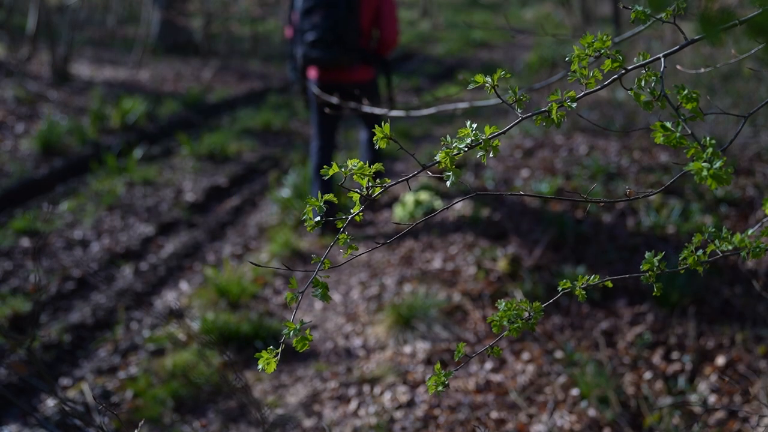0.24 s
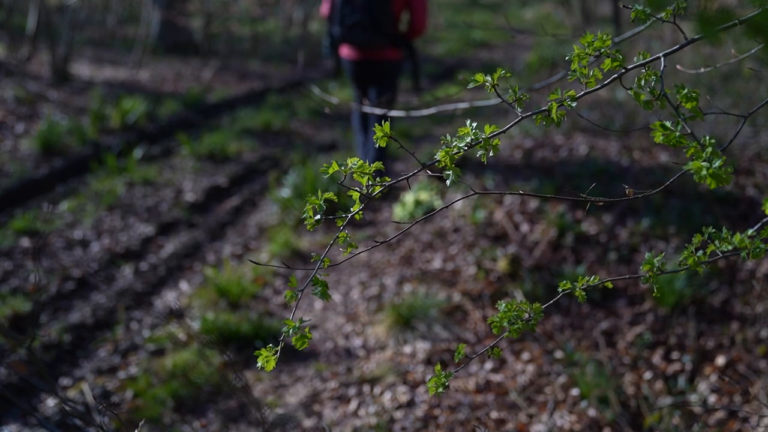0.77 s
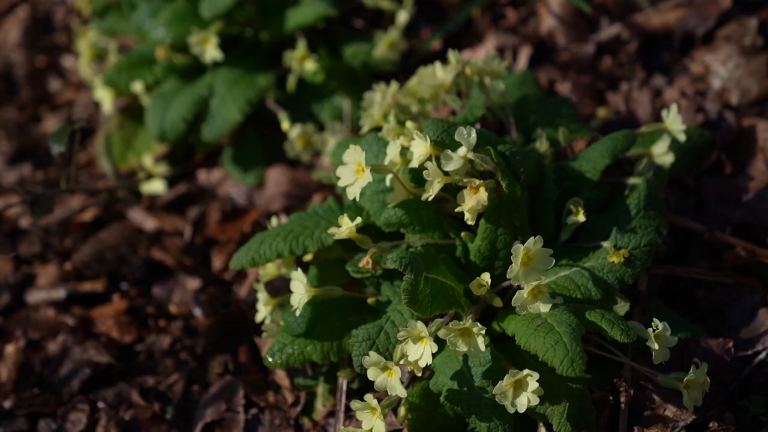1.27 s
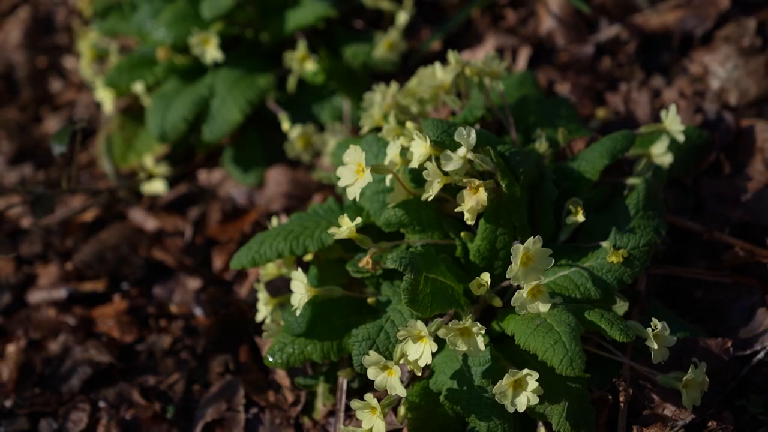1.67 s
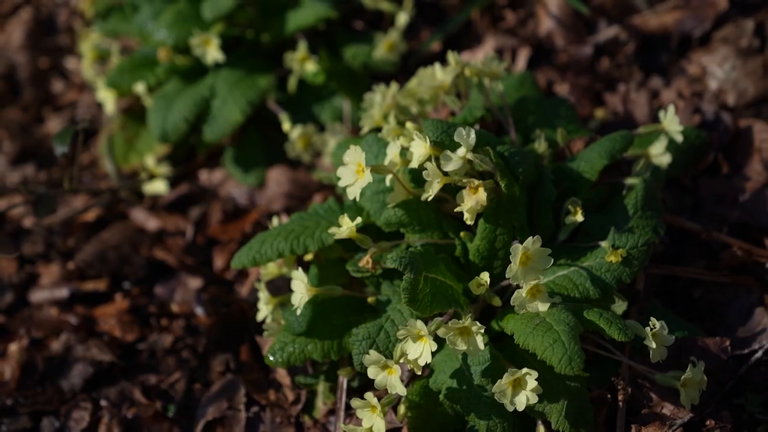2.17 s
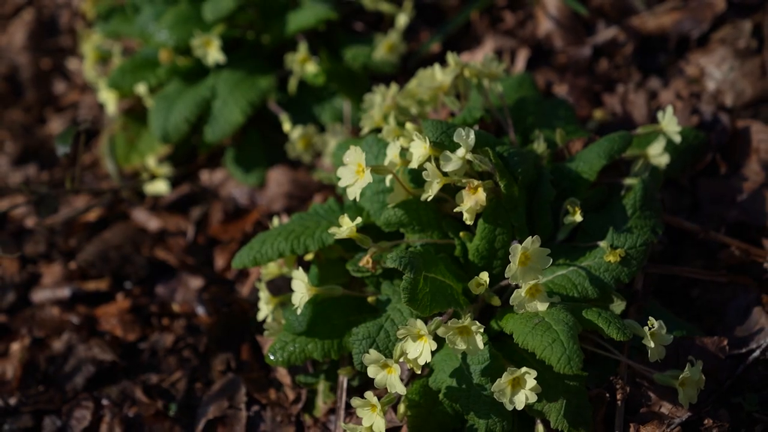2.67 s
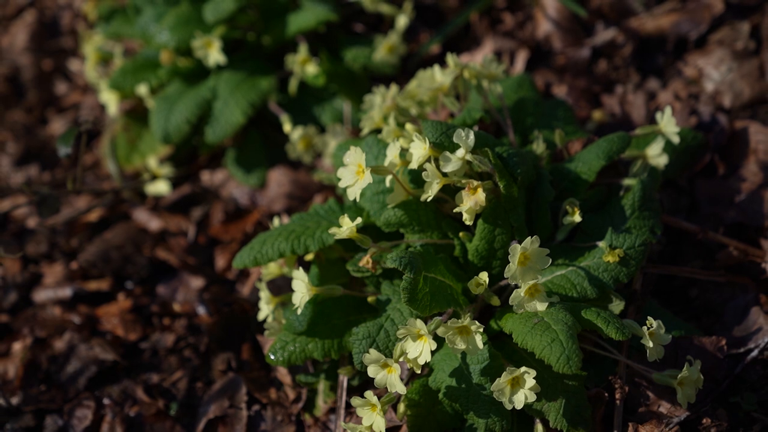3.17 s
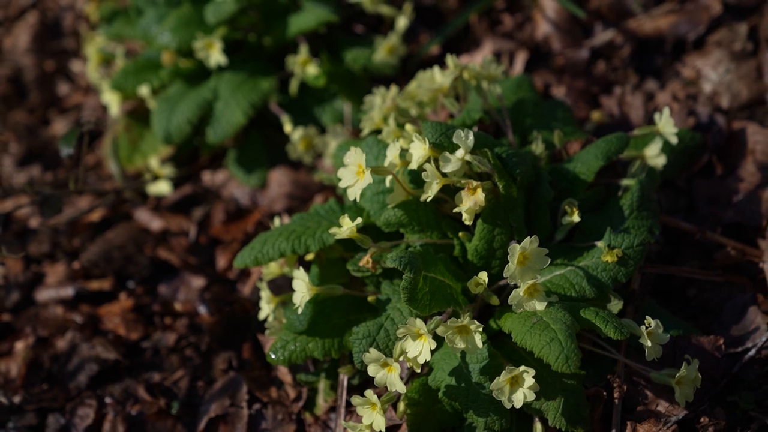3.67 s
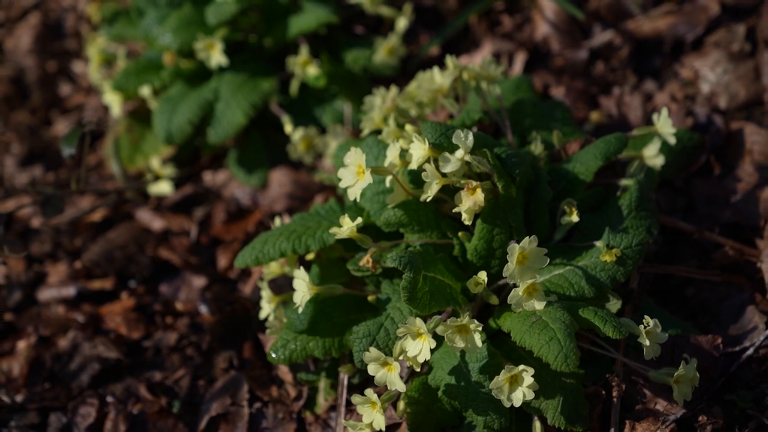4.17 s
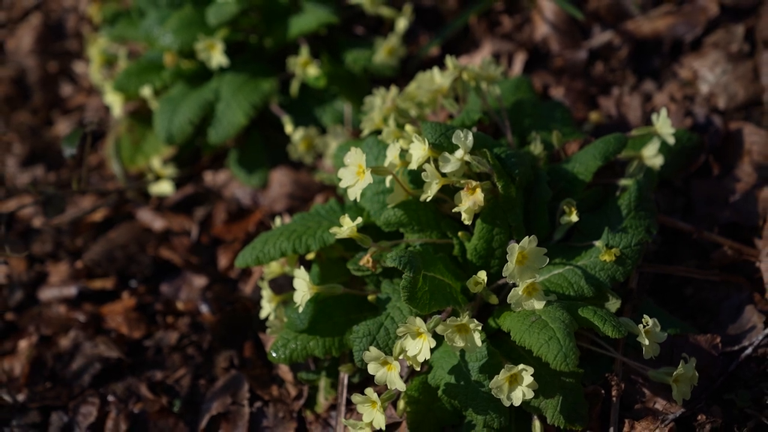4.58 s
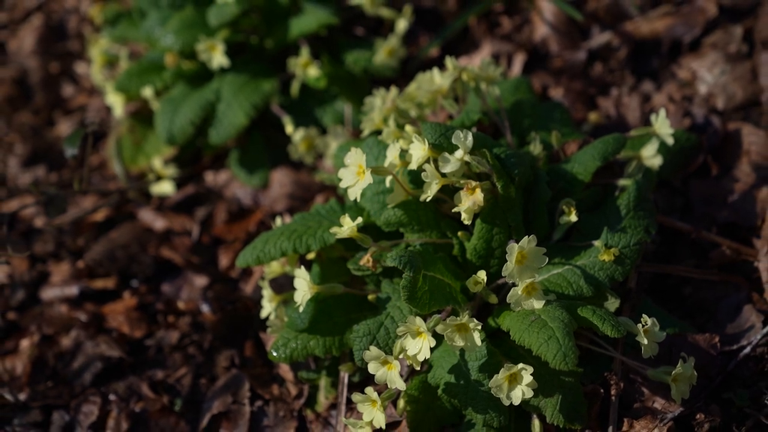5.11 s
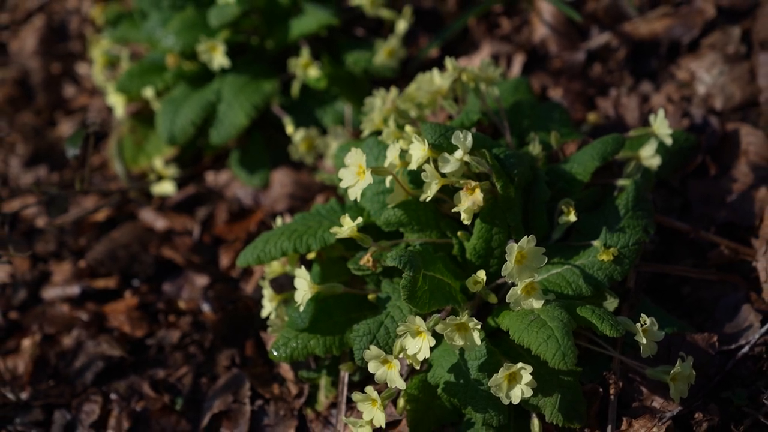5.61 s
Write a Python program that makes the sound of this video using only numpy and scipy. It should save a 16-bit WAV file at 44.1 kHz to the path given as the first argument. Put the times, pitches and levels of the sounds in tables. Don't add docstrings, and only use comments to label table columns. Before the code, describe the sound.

Outdoors in a wood, over soft far traffic rumble and steady hiss, a warbler gives sharp falling chirps with long echoes while boots crunch soil and dry leaves and twigs snap. At about 1.2 seconds the scene cuts: steps stop, one loud clear whistle arches close by, then fainter far whistles, a twittering flock and finally the warbler again.

```python
import sys
import numpy as np
from scipy import signal
from scipy.fft import rfft, irfft, next_fast_len
from scipy.io import wavfile
from scipy.ndimage import uniform_filter1d

SR = 44100
rng = np.random.default_rng(int(sys.argv[2]) if len(sys.argv) > 2 else 0)


def rack_gain(trim_db):
    fader = np.asarray(trim_db, float)
    return 10 ** (fader / 20)


def generate_wav(sig):
    pcm = np.round(np.clip(np.atleast_2d(sig).T, -1, 1) * 32767).astype(np.int16)
    wavfile.write(sys.argv[1], SR, pcm)


N = 257984
SCENE_CHANGE_S = 1.2293


def evened(x):
    return x / np.sqrt(np.mean(x ** 2) + 1e-20)


def read(points, hz):
    point_hz, value = np.transpose(points)
    return np.interp(np.log(hz + 1), np.log(point_hz + 1), value)


def add(mix, start_s, sound):
    part = mix[round(start_s * SR):][:len(sound)]
    part += sound[:len(part)]


def colour(x, points):
    size = next_fast_len(len(x))
    gain = rack_gain(read(points, np.fft.rfftfreq(size, 1 / SR)))
    return irfft(rfft(x, size) * gain, size)[:len(x)]


def drift(count, window):
    return evened(uniform_filter1d(rng.standard_normal(count), size=window))


def whistle(pitch_hz, level_db, flicker_db):
    size = len(pitch_hz)
    noise = uniform_filter1d(rng.standard_normal((2, SR)), size=300)
    flicker, wobble = evened(uniform_filter1d(noise, size=200))[:, :size]
    pitch_hz = pitch_hz * (1 + 0.0022 * flicker_db * wobble)
    tone = np.sin(2 * np.pi * np.cumsum(pitch_hz) / SR)
    tone *= signal.windows.tukey(size, min(1, 160 / size))
    return np.sqrt(2) * rack_gain(level_db + flicker_db * flicker) * tone


# pitch_hz, t60_s
TRUNK_DECAY = [(500, 2.1), (2300, 2.2), (3500, 1.64), (5200, 1), (8000, 1.09)]


def wood(x, wet_db, build_s, early_db, depth=0.92, path=((0, 0),)):
    count = 2 * SR // 20
    echoes = np.zeros(2 * SR)
    echoes[20 * np.arange(count) + rng.integers(0, 20, count)] = rng.choice([-1., 1.], count)
    hz, t, bands = signal.stft(echoes, SR, nperseg=256)
    t60_s = depth * read(TRUNK_DECAY, hz)[:, None]
    tail = signal.istft(bands * rack_gain(-60 * t / t60_s), SR, nperseg=256)[1]
    tail *= 1 - np.exp(-np.arange(len(tail)) / SR / build_s)
    tail *= rack_gain(wet_db) / np.sqrt(np.sum(tail ** 2))
    bounces = np.round(np.array([.0031, .0074, .0131, .022]) * SR).astype(int)
    tail[bounces] += rack_gain(early_db) * np.array([-0.048, -0.73, 0.73, -0.61])
    return colour(x, path) + signal.fftconvolve(x, tail)[:N]


def sing(notes, wet_db, build_s, early_db, depth, path=((0, 0),)):
    dry = np.zeros(N)
    for start_s, sound in notes:
        add(dry, start_s, sound)
    return wood(dry, wet_db, build_s, early_db, depth, path)


# pitch_hz, level_db (per Hz)
AIR_SPECTRUM = [(13, -57), (22, -30.5), (54, 1.5), (114, -2), (240, -14.5), (325, -14.5), (427, -17.5),
                (477, -16.5), (782, -16), (1430, -26), (3440, -23.5), (5800, -24.5), (15600, -30)]
# start_s, level_db
TRAFFIC_SWELL = [
    (0.0, -63),
    (0.9, -64.5),
    (1.9, -60),
    (2.3, -61.5),
    (2.7, -60.5),
    (3.7, -58),
    (4.1, -60.5),
    (4.6, -59),
    (5.85, -62),
]
AIR_DB = -57.5


def air():
    frames, hz = N // 256 + 5, np.fft.rfftfreq(1024, 1 / SR)
    real, imaginary, patches = rng.standard_normal((frames, 513, 3)).T
    patches = uniform_filter1d(patches, size=10, axis=0)
    patches = evened(uniform_filter1d(patches, size=30, axis=1))
    start_s, level_db = np.transpose(TRAFFIC_SWELL)
    frame_s = (np.arange(frames) - 2) * 256 / SR
    swell_db = np.interp(frame_s, start_s, level_db - level_db.mean())
    rumble_share = 0.75 / (1 + (hz[:, None] / 200) ** 4)
    bands = (real + 1j * imaginary) * rack_gain(0.096 * patches + rumble_share * swell_db)
    noise = signal.istft(bands, nperseg=1024, noverlap=768)[1][:N]
    return rack_gain(AIR_DB) * evened(colour(noise, AIR_SPECTRUM))


# start_s, level_db
FLOCK_SWELL = [
    (2.901, -83),
    (3.3, -80),
    (3.7, -85),
    (4.0, -78.5),
    (4.35, -75),
    (4.7, -87),
    (5.05, -75.5),
    (5.4, -81),
    (5.85, -78),
]


def flock():
    notes = []
    s, db = np.transpose(FLOCK_SWELL)
    for when, pitch, glide in rng.random((260, 3)):
        start_s = s[0] + when * (s[-1] - s[0])
        pitch_hz = (3700 + 1700 * pitch) * np.linspace(1.08 + 0.193 * glide, 1, 700)
        notes.append((start_s, whistle(pitch_hz, np.interp(start_s, s, db), 1.35)))
    return notes


# start_s, length_s, pitch_hz, level_db
DISTANT_NOTES = [(1.88, .07, 2274, -76), (1.98, .08, 2075, -79), (2.1, .078, 1980, -79.5),
                 (2.22, .089, 1880, -79), (2.4, .08, 1885, -87), (2.552, .08, 1905, -85),
                 (3.497, .07, 7500, -75.5), (3.696, 0.048, 7130, -75), (3.84, .05, 7300, -80),
                 (4.575, .13, 6650, -80), (4.857, 0.077, 2370, -78), (4.948, 0.085, 2255, -76.5),
                 (5.17, 0.094, 1833, -80), (5.27, 0.06, 1875, -82), (5.37, .1, 1856, -85),
                 (4.84, .043, 4170, -74)]
DISTANT_FALL = .04


def distant():
    notes = []
    for start_s, length_s, pitch_hz, level_db in DISTANT_NOTES:
        size = round(length_s * SR)
        fall = DISTANT_FALL * np.linspace(.5, -.5, size)
        waver = 0.02 * drift(SR, 900)[:size]
        notes.append((start_s, whistle(pitch_hz * (1 + fall + waver), level_db, 3.6)))
    return sing(notes + flock(), 1.7, 0.0083, -11.0, 1.0)


# start_s, level_db (peak), pitch_hz
TWIG_SNAPS = [(.392, -46, 5300), (.596, -44, 6900), (.598, -52, 8700), (.657, -47, 8000), (.66, -51, 4540),
              (.725, -45, 7550), (.757, -48, 5630), (.79, -47, 10000), (.796, -46, 9500), (.807, -47, 7000),
              (.856, -50, 10100)]
TWIG_T60_S = 0.015
# start_s, level_db (peak), pitch_hz, t60_s
STONE_KNOCKS = [(.043, -48.5, 594, 0.031), (.087, -50, 1210, 0.027), (.107, -51.5, 1160, 0.034),
                (.262, -52, 461, .04), (.391, -47, 1780, .025), (.442, -49, 700, 0.014),
                (.66, -48.5, 1205, .02), (.725, -43, 1500, 0.0074), (.757, -47, 1300, 0.016),
                (1.159, -52, 420, 0.051), (1.7597, -39, 495, .0053), (1.7602, -50.5, 1500, .0082),
                (2.1, -52, 1110, .01), (2.249, -46.5, 270, 0.029), (2.2509, -45.5, 810, 0.0094),
                (2.25, -53, 1600, .008), (2.339, -59, 536, .012), (4.165, -47.5, 150, 0.035),
                (5.026, -54, 1353, .011)]


def snaps():
    out, t = np.zeros(N), np.arange(2000) / SR
    twigs = [row + (TWIG_T60_S,) for row in TWIG_SNAPS]
    for start_s, level_db, pitch_hz, t60_s in STONE_KNOCKS + twigs:
        splinters = 1 + .5 * drift(len(t), max(round(SR / pitch_hz), 1))
        ring = np.sin(2 * np.pi * pitch_hz * t)
        add(out, start_s, rack_gain(level_db - 60 * t / t60_s) * ring * splinters)
    return wood(out, -10.0, 0.0092, -18.0)


# start_s, decay_s, soil_level_db, leaf_level_db
BOOT_CRUSHES = [(0.0, 0.021, -54.5, -61.5), (.11, 0.11, -61, -66), (.264, 0.055, -62.5, -65),
                (.4, 0.027, -59, -55), (.45, 0.14, -58, -62), (.54, .05, -60, -62), (.6, 0.014, -63, -54.5),
                (0.661, 0.017, -60, -46), (.7, 0.045, -59, -55), (.756, 0.0059, -56.5, -46.5),
                (.79, 0.028, -61, -55), (.855, 0.018, -66, -63), (.95, 0.3, -60, -59),
                (1.222, 0.018, -63, -65)]
BUILD_S = 0.015


def press(level_column):
    t, power = np.arange(N) / SR, np.zeros(N)
    for row in BOOT_CRUSHES:
        lag = t - row[0]
        power += rack_gain(2 * row[level_column]) * np.exp(np.where(lag < 0, lag / BUILD_S, -lag / row[1]))
    return np.sqrt(power)


# pitch_hz, level_db (per Hz)
SOIL_SPECTRUM = [(88, -51), (150, -16), (340, -2), (800, -2.5), (889, -4.5), (962, -4.5), (3500, -17),
                 (4550, -49), (7700, -120)]
# pitch_hz, level_db (per Hz)
LEAF_SPECTRUM = [(1180, -50), (2000, -23), (2590, -11.5), (3200, -10), (3550, -3.5), (4590, -5),
                 (5130, -4.5), (5590, -8), (9930, -10), (15500, -24)]


def crunch(pressure, body, grains_per_s, spread_db):
    hits = (rng.random(N) < grains_per_s / SR) * rng.standard_normal(N)
    clumps_db = 2.5 * drift(N, 350)
    sizes = rack_gain(spread_db * np.minimum(rng.exponential(1, N), 4) + clumps_db)
    return pressure * evened(colour(hits * sizes + 0.68 * rng.standard_normal(N), body))


def boots():
    soil = crunch(press(level_column=2), SOIL_SPECTRUM, 3000, 3.5)
    leaves = crunch(press(level_column=3), LEAF_SPECTRUM, 8000, 2.5)
    return soil + leaves


# crest_s, crest_hz, level_db, rise_stretch, roundness
FAR_ARCHES = [
    (3.366, 3696, -57, 1.07, 2.2),
    (3.83, 3788, -56, 1.03, 2),
    (4.44, 3820, -55.5, 1.2, 1.8),
]
RISE_S, FALL_S, RISE_HZ, FALL_HZ = .122, .136, 1600, 1077


def arch(crest_s, crest_hz, level_db, stretch, roundness):
    rise_s = RISE_S * stretch
    t = np.arange(-rise_s, FALL_S, 1 / SR)
    rising = t < 0
    reach = abs(t / np.where(rising, t[0], FALL_S))
    pitch_hz = crest_hz - np.where(rising, RISE_HZ, FALL_HZ) * reach ** roundness
    weakening_db = np.where(rising, 8.5, 9.5) * ((crest_hz - pitch_hz) / 1000) ** 2.4
    return crest_s + t[0], whistle(pitch_hz, level_db - weakening_db, 2.2)


def far_thrush():
    return sing([arch(*row) for row in FAR_ARCHES], -5.0, 0.0052, -18.0, 0.91)


# start_s, pitch_hz, level_db
NEAR_WHISTLE = [
    (1.15, 2350, -47),
    (1.195, 2960, -33),
    (1.23, 3335, -33.5),
    (1.268, 3540, -37.5),
    (1.325, 3537, -31),
    (1.368, 3482, -39),
    (1.39, 3330, -33),
    (1.412, 3273, -34),
    (1.433, 2800, -65),
]


def near_thrush():
    s, hz, db = np.transpose(NEAR_WHISTLE)
    t = np.arange(s[0], s[-1], 1 / SR)
    pitch_hz, level_db = [uniform_filter1d(np.interp(t, s, curve), size=400, mode="nearest")
                          for curve in (hz, db)]
    return sing([(s[0], whistle(pitch_hz, level_db, 0.33))], -11.5, 0.012, -19.0, 0.99)


DROOP_S, ATTACK_S, ATTACK_DB = 0.00607, 0.0019, -9


def chirp(start_s, length_s, rest_hz, level_db, settle_s,
          onset_hz, creep_hz_per_s, droop_hz, onset_db, onset_s, sag_db_per_s, flicker_db):
    t = np.arange(max(-start_s, 0), length_s, 1 / SR)
    tense = np.exp(-(t / settle_s) ** 1.48)
    droop = droop_hz * np.exp((t - length_s) / DROOP_S)
    pitch_hz = rest_hz + (onset_hz - rest_hz) * tense + creep_hz_per_s * t - droop
    swell_db = onset_db * np.exp(-t / onset_s) + sag_db_per_s * t
    attack_db = ATTACK_DB * np.exp(-t / ATTACK_S)
    return max(start_s, 0), whistle(pitch_hz, level_db + swell_db + attack_db, flicker_db)


# start_s, length_s, rest_hz, level_db, settle_s
CHIFF_STROKES = [
    (.016, 0.0303, 5130, -48.5, .008),
    (.673, .04, 5104, -52.5, .01),
    (5.171, 0.0356, 5166, -48, 0.0066),
]
SLIDE_STROKES = [
    (.05, 0.043, 3470, -64, 0.016),
    (.72, 0.042, 3530, -67.5, .015),
    (5.205, .036, 3440, -63.5, .023),
]
CHAFF_STROKES = [
    (-.11, .122, 3950, -67, .011),
    (.347, 0.12, 3864, -65, 0.014),
    (.998, 0.12, 3910, -64, 0.011),
    (5.524, .088, 4120, -59.5, .0052),
]
# onset_hz, creep_hz_per_s, droop_hz, onset_db, onset_s, sag_db_per_s
CHIFF_SHAPE = (6450, 90, 30, -9, 0.05, -90)
SLIDE_SHAPE = (5200, 90, 33, 7.2, 0.011, 30)
CHAFF_SHAPE = (6600, 1500, 470, 8.2, .022, 4.4)


def warbler(from_s, until_s, flicker_db):
    kinds = ((CHIFF_STROKES, CHIFF_SHAPE), (SLIDE_STROKES, SLIDE_SHAPE), (CHAFF_STROKES, CHAFF_SHAPE))
    rows = []
    for strokes, shape in kinds:
        rows += [row + shape for row in strokes if from_s <= row[0] < until_s]
    return [chirp(*row, flicker_db) for row in sorted(rows)]


# pitch_hz, level_db
BEHIND_LEAVES = [(3400, -6), (4200, 0), (5000, 3), (6000, -3)]
# pitch_hz, level_db
GROUND_DIP = [(4900, 1.5), (5150, -14), (5300, -10), (5480, 2.5)]
EDGE_HZ = 15760


def scene():
    early_warbler = warbler(-1, SCENE_CHANGE_S, 2.13)
    first = sing(early_warbler, 6.6, 0.0053, -2.5, 0.94, BEHIND_LEAVES) + boots()
    late_warbler = warbler(SCENE_CHANGE_S, N / SR, 1.3)
    again = sing(late_warbler, 4.0, 0.012, -14.0, 0.87, GROUND_DIP)
    second = near_thrush() + far_thrush() + again + distant()
    around = snaps() + air()
    edge = [(EDGE_HZ, 0), (EDGE_HZ + 20, -90)]
    before, after = [colour(part + around, edge) for part in (first, second)]
    return np.where(np.arange(N) < SCENE_CHANGE_S * SR, before, after)[None]


def top_cut(x):
    return signal.sosfilt(signal.butter(12, 16550, fs=SR, output="sos"), x)


def record(dry):
    return top_cut(dry)


dry = scene()
out = record(dry)
generate_wav(out)
```